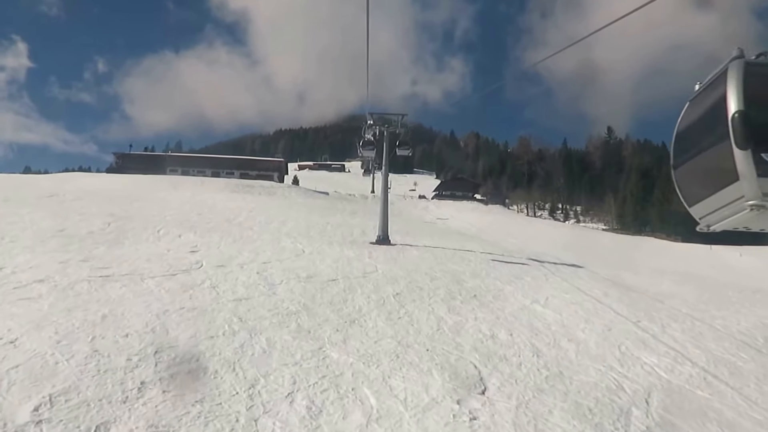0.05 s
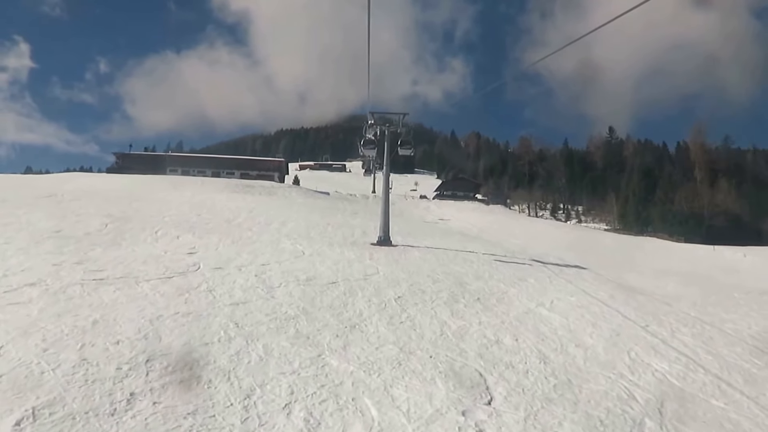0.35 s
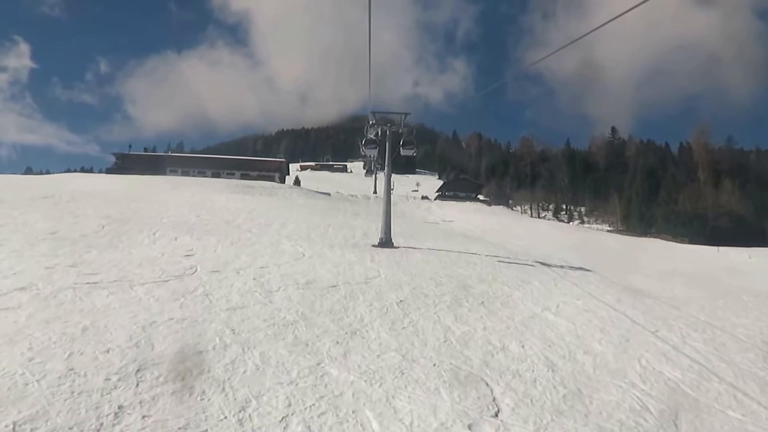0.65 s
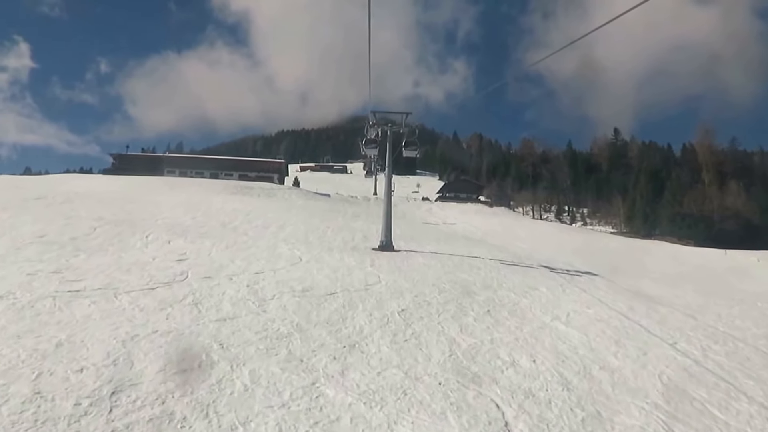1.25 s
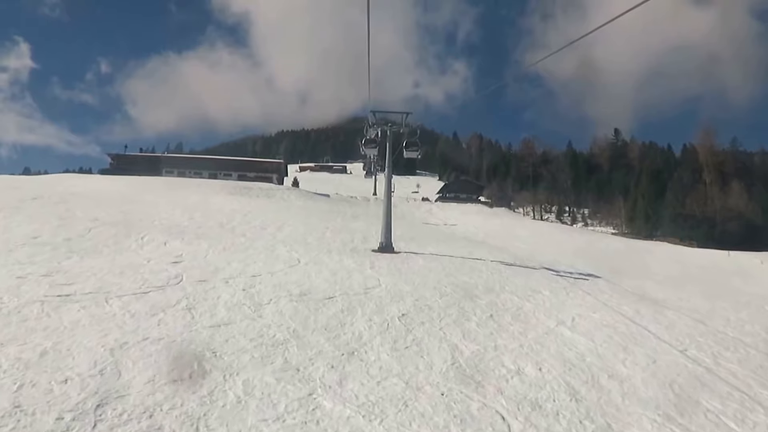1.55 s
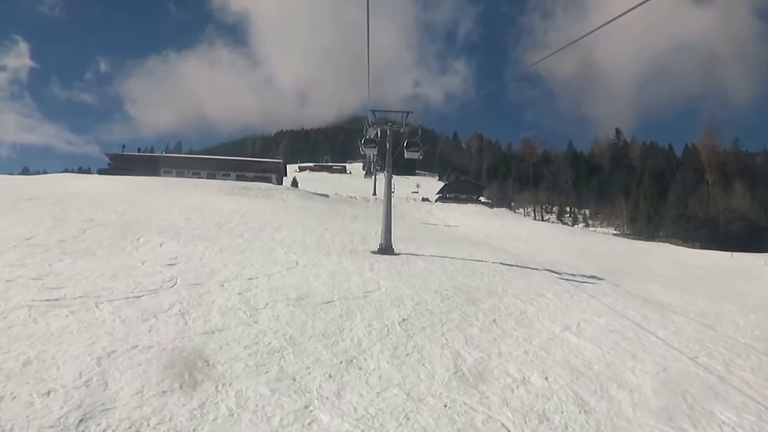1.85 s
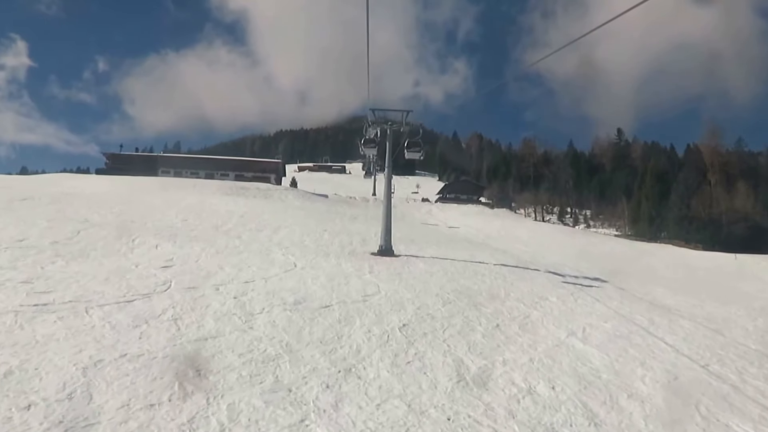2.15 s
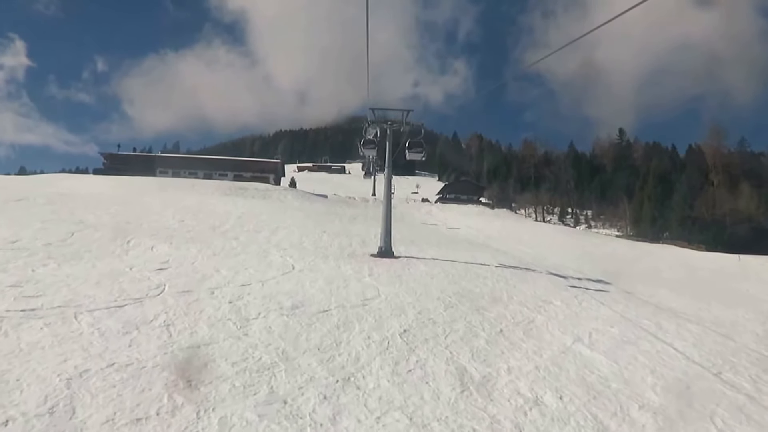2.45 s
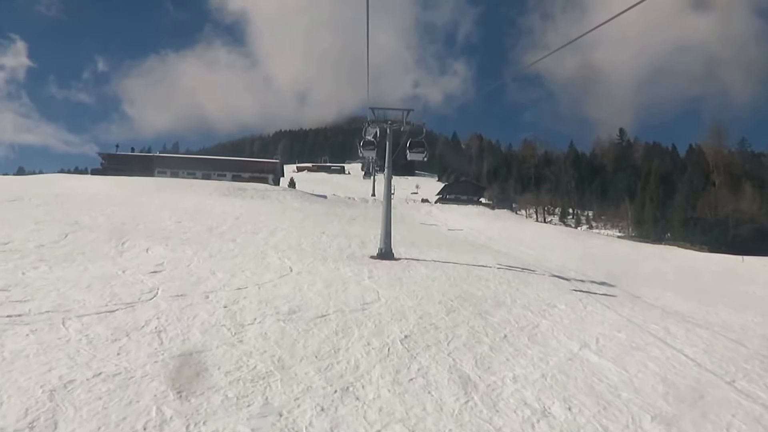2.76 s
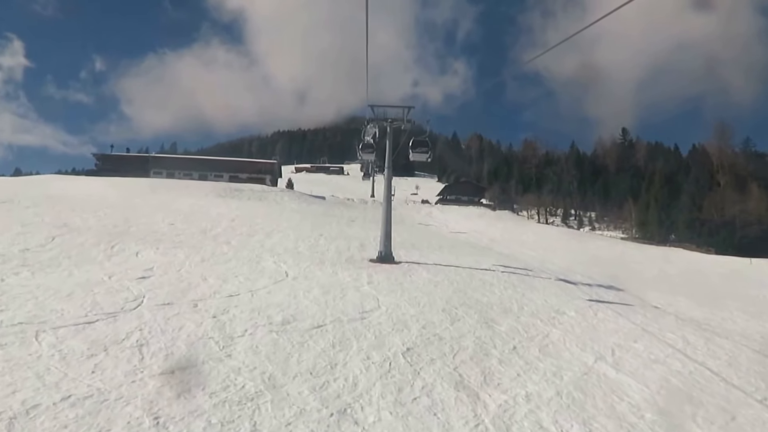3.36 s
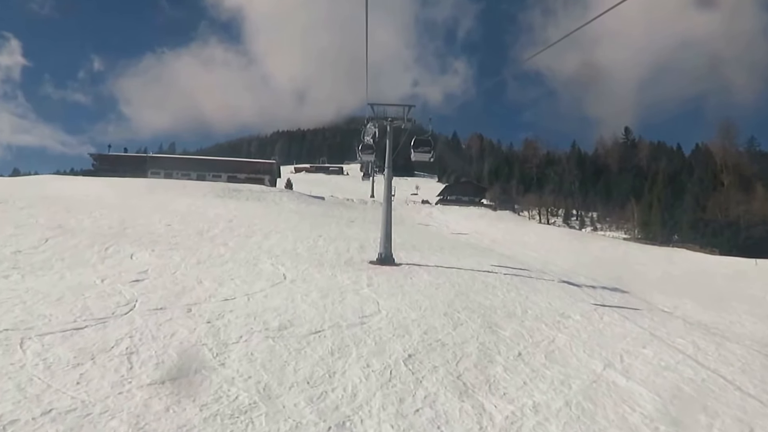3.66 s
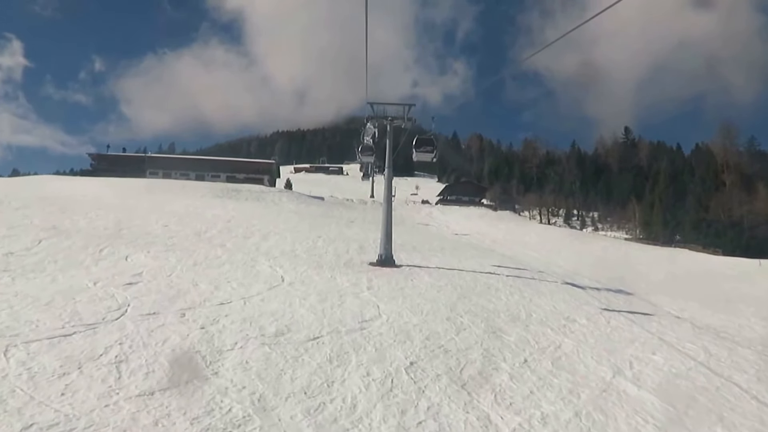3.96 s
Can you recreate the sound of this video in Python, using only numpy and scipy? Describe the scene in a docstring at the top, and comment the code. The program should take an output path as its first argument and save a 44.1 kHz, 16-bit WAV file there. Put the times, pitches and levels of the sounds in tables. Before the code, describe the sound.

Something loose knocks in short, rapid runs against the shell of a moving gondola cabin, heard from inside over a low rumble and hum. Halfway through, wind rises to a rustle and hollow howl, with small creaks and ticks nearby.

```python
"""Something loose knocks against the shell of a gondola cabin gliding up a snowy slope. The blows come
in short runs, about twelve a second, and flutter between the walls. The running rope shakes the cabin,
so it rumbles and hums. Wind hisses past, rising halfway through to a rustle on the shell and a hollow
howl in the gaps. A few small scuffs, creaks and ticks sound close by."""
import sys
import numpy as np
from scipy import signal
from scipy.fft import rfft, irfft
from scipy.io import wavfile
from scipy.ndimage import uniform_filter1d

SR = 44100
rng = np.random.default_rng(int(sys.argv[2]) if len(sys.argv) > 2 else 0)


def bounce(signal):
    """Save signal as a 16-bit WAV file at the path given by the first command-line argument."""
    frames = np.transpose(np.atleast_2d(signal))
    limited = np.clip(frames, -1, 1)
    pcm = np.round(limited * 32767).astype(np.int16)
    wavfile.write(sys.argv[1], SR, pcm)


N = 176400
TIME, HZ = np.arange(N) / SR, np.fft.rfftfreq(N, 1 / SR)


# blows on the shell: t/s, thump level/dB, clack level/dB, boom level/dB
BLOWS = [(0.7892, 0, 0, -4), (0.8686, -1.5, -5.5, 2.5), (0.9475, -14, -41, -20), (1.3562, -5.5, -7, -11),
         (1.4385, 1.5, -0.5, 3), (1.5172, -4.5, -17, 4), (1.5958, -4, -10, -3), (1.677, -13, -37, -19),
         (1.7595, -10, -21, -4.5), (2.1662, -13, -17, -6), (2.329, -22, -8, -28), (2.4092, -0.5, 0.5, -7),
         (2.4918, 0.5, 0, 0.5), (2.574, -30, -6, -20), (2.648, -14.5, -6, -20), (2.732, -16, -30, -23),
         (2.8149, -8.5, -25, -3.5), (2.895, -3, -8, -19), (2.974, -9, 0, 1.5), (3.0551, -2.5, -11, 2.5),
         (3.134, -1, -12, 3), (3.446, -10.5, -17, -10), (3.7736, -2, -23, -21), (3.8536, 0, -6.5, -30),
         (3.938, 0.5, 2.5, -15)]
# notes the cabin rings at: f/Hz, width/Hz, level in knocks/dB, level in rumble/dB
CABIN_NOTES = [(84.7, 7.3, 2, 9.5), (126.1, 6.4, 5, 11), (152.2, 17.6, -3.5, 1.5), (232, 16, -3.5, 7),
               (294, 18, -0.5, 11.5), (340, 24, -6.5, -3), (418.6, 15, -17, 1.5), (598, 10, -30, -5),
               (810, 8.9, 0, 2.5)]
# tone of the clack: f/Hz, level/dB
CLACK_TONE = [(150, -10), (400, 4), (560, 6), (700, 0.5), (870, 3), (1100, -16), (1400, -22), (1850, -12.5),
              (2400, -45), (6000, -39.5), (15000, -40)]
def knocks():
    """Each blow is a falling thump that bounces between the walls and rings the cabin, plus a clack."""
    start_hz, end_hz, glide_s = 750.5, 135.2, 0.00373  # the panel carries treble faster than bass
    hz = end_hz + (start_hz - end_hz) * np.exp(-TIME / glide_s)
    age = TIME / 0.0073  # the swell peaks at age 1
    thump = -(age * np.exp(1 - age)) ** 2 * np.sin(2 * np.pi * np.cumsum(hz) / SR)
    ring = 1 + sum(amp(db) * peak(f, width) for f, width, db, _ in CABIN_NOTES)
    blow = irfft(rfft(thump) * walls() * ring, N)[:SR // 2]
    thumps = play_at(blow, [(t, db) for t, db, _, _ in BLOWS])
    echo_s = WALL_ECHOES[0][0]
    clack_level = sum(amp(db) * (burst(t + 0.0031, 0.0098, 0.00054) + 0.49 * burst(t + echo_s, 0.031))
                      for t, _, db, _ in BLOWS)
    return amp(-10.5) * thumps + amp(-26) * clack_level * noise(tone(CLACK_TONE))


# first echoes in the cabin: delay/s, gain (minus flips the wave), treble limit/Hz
WALL_ECHOES = [(0.0169, 0.87, 2500), (0.0327, -0.42, 2000), (.0396, .7, 330), (.053, 0.15, 900)]
def walls():
    """A filter that adds the walls' late, duller copies to the direct sound."""
    return 1 + sum(gain * np.exp(-2j * np.pi * HZ * delay) / (1 + 1j * HZ / limit)
                   for delay, gain, limit in WALL_ECHOES)


# notes of the struck panel: f/Hz, level/dB, decay/s
PANEL_NOTES = [(496, -26, 0.0051), (591.4, -26, 0.013), (746, -38, 0.009), (832, -35, 0.013),
               (1314, -45, 0.014), (1788, -35.5, 0.0097)]
def panel():
    """The struck panel rings briefly under each clack, and the walls repeat it."""
    ring = sum(amp(db) * np.exp(-TIME / decay) * np.sin(2 * np.pi * f * TIME)
               for f, db, decay in PANEL_NOTES)
    echoed = irfft(rfft(ring) * (1 + 0.29 * (walls() - 1)), N)[:SR // 4]
    return play_at(echoed, [(t + 0.002, db) for t, _, db, _ in BLOWS])


def late_echoes():
    """Many later echoes blur each blow into the next."""
    power = sum((amp(db) * burst(t + 0.017, decay_s=0.029, rise_s=0.015)) ** 2 for t, db, _, _ in BLOWS)
    blur = steadied(noise(abs(peak(hz=312, width_hz=270)) ** 3), window_s=0.024, share=0.43)
    return amp(-19.5) * np.sqrt(power) * blur


# notes of the floor: f/Hz, width/Hz, level/dB
FLOOR_NOTES = [(89, 9.1, -15), (114.7, 14, -5.5), (163, 19, -7)]
def floor_boom():
    """The floor takes up each knock slowly and booms on."""
    power = sum((amp(db) * burst(t, decay_s=0.087, rise_s=0.02)) ** 2 for t, _, _, db in BLOWS)
    drone = steadied(ringing_noise(FLOOR_NOTES), window_s=0.18, share=1)
    return amp(-17.5) * np.sqrt(power) * drone


# strength of the deep shudder: t/s, level/dB
SHUDDER_LEVEL = [(0.0, -40.5), (0.11, -26.5), (0.19, -50), (0.24, -27.5), (1.2, -29), (1.28, -17.5),
                 (1.35, -35), (1.65, -22), (1.8, -37), (1.9, -15.5), (2.0, -28.5), (2.03, -22.5),
                 (2.62, -36), (2.66, -29), (3.99, -26.5), (4.0, -30)]
# tone of the drone: f/Hz, level/dB
DRONE_TONE = [(15, -18), (45, 2.5), (60, -6), (90, -2), (145, -1), (200, -5), (300, -18), (450, -16),
              (600, -22), (800, -24), (1100, -31.5), (1900, -38.5), (2600, -50), (8000, -84)]
# strength of the drone: t/s, level/dB
DRONE_LEVEL = [(0, -27), (.5, -27), (.9, -21.5), (1.15, -26), (1.6, -20.5), (2.1, -24), (2.5, -22),
               (2.68, -21), (2.78, -21.5), (2.95, -20.5), (3.15, -23), (3.3, -22), (3.42, -23),
               (3.6, -21.5), (4, -20.5)]
def rope_rumble():
    """The running rope shakes the cabin: a deep shudder, and a drone that rings the cabin's notes."""
    shudder_hz, width_hz = 33.4, 4.9
    deep_band = abs(peak(shudder_hz, width_hz) * peak(shudder_hz, 3 * width_hz))
    shudder = steadied(noise(deep_band), window_s=0.052, share=0.44)
    ring = 1 + sum(amp(db) * abs(peak(f, width)) ** 2 for f, width, _, db in CABIN_NOTES)
    drone = steadied(noise(tone(DRONE_TONE) * ring), window_s=0.11, share=0.64)
    return level(SHUDDER_LEVEL) * shudder + level(DRONE_LEVEL) * drone


# strength of the low hum: t/s, level/dB
HUM_SWELLS = [(0, -31.5), (.25, -27), (.55, -35), (1.02, -25), (1.15, -36), (1.85, -31), (2.05, -23.5),
              (2.45, -33), (2.65, -28), (3.48, -40), (3.56, -20.5), (3.68, -22.5), (3.76, -35), (3.9, -21),
              (4, -29.5)]
def cabin_hum():
    """The cabin's lowest note swells and fades as the rope shakes it."""
    hum = noise(abs(peak(hz=85.54, width_hz=8.3)) ** 2)
    return level(HUM_SWELLS) * steadied(hum, window_s=0.12, share=0.72)


# strength of the hiss: t/s, level/dB
HISS_GUSTS = [(0, -61), (.2, -48), (.38, -56), (.48, -55.5), (.72, -49), (.92, -54), (1.15, -55.5),
              (1.35, -52.5), (1.58, -48), (1.68, -54.5), (1.8, -52), (1.9, -43.5), (2.06, -38), (2.2, -37),
              (2.29, -36.5), (2.45, -37.5), (2.57, -35.5), (2.61, -41.5), (2.68, -45), (2.85, -45),
              (3.03, -40.5), (3.1, -33), (3.19, -46), (3.33, -49), (3.45, -38), (3.58, -41.5),
              (3.66, -38.5), (3.77, -44), (3.88, -37.5), (4, -39)]
# tone of the hiss: f/Hz, level/dB
HISS_TONE = [(300, 8), (800, 0.5), (1200, 4), (1900, 4), (2700, -1), (3700, 1.5), (5000, -2.5), (7000, -5),
             (8800, -9), (10500, -6.5), (12000, -12), (13300, -1), (14300, -33), (15200, -4.5)]
# strength of the high fizz: t/s, level/dB
FIZZ_GUSTS = [(0, -61), (.45, -70), (.535, -55), (.58, -60.5), (.72, -55.5), (.78, -51.5), (.85, -66),
              (1.2, -65), (1.75, -64), (1.95, -48.5), (2.15, -45), (2.35, -59), (3.3, -62), (3.42, -44),
              (3.6, -54), (4, -44)]
# tone of the fizz: f/Hz, level/dB
FIZZ_TONE = [(2000, -13), (4000, -13), (7000, 5), (9000, -1), (10500, 6), (12000, 1.5), (13500, 9),
             (14500, -19), (15200, -30)]
# one sharp gust: t/s, level/dB
SHARP_GUST = [(3.0, -64), (3.06, -56), (3.092, -30), (3.135, -55), (3.18, -50)]
def wind():
    """Gusts hiss past the shell with a fine fizz on top and one sharp swish."""
    hiss = level(HISS_GUSTS) * noise(tone(HISS_TONE)) * amp(2 + 0.52 * flicker(rate_hz=27))
    fizz = level(FIZZ_GUSTS) * noise(tone(FIZZ_TONE))
    in_gust = (TIME > SHARP_GUST[0][0]) * (TIME < SHARP_GUST[-1][0])
    swish = level(SHARP_GUST) * in_gust * noise(abs(peak(hz=1420, width_hz=2800)) ** 2)
    return grainy_hiss(hiss + fizz + swish)


def grainy_hiss(sound, count=14, waver_db=2):
    """Each band of the hiss wavers in level at random, making it grainy."""
    band_number = curve([(400, 0), (15000, count - 1)])
    spectrum = rfft(sound)
    bands = (irfft(spectrum * np.maximum(1 - abs(band_number - k), 0), N) for k in range(count))
    return sum(band * amp(waver_db * flicker(rate_hz=24)) for band in bands)


# notes of the cabin's gaps: f/Hz, width/Hz, level/dB
GAP_NOTES = [(405.3, 30.5, 3.5), (505, 100, -1.5), (610, 29, -3), (707, 22, -3.5), (830, 62, -7.5),
             (960, 61, -10), (1060, 25, -12), (1314, 60, -14.5), (1720, 71, -18)]
# bend of those notes: t/s, pitch factor
HOWL_BEND = [(0, 0.92), (2.03, 0.97), (2.22, 0.97), (2.33, 0.94), (2.43, 1.02), (2.54, 1.05), (2.7, .95),
             (3.1, 1.04), (3.3, .96), (4, 1.03)]
# strength of the howl: t/s, level/dB
HOWL_GUSTS = [(0, -46), (1.8, -52), (2, -32.5), (2.1, -30.5), (2.22, -29), (2.33, -30.5), (2.54, -28),
              (2.66, -45.5), (2.9, -36), (3.1, -29), (3.25, -45.5), (3.65, -34.5), (4, -42)]
def howl():
    """Wind rings in the gaps with a hollow sound that drifts up and down in pitch."""
    hollow = ringing_noise(GAP_NOTES)
    speed = np.interp(TIME, *np.transpose(HOWL_BEND))
    position = np.cumsum(speed) % N  # reading the noise faster raises its pitch
    return level(HOWL_GUSTS) * np.array([np.interp(position, np.arange(N), side) for side in hollow])


# brief whistles: t/s, length/s, f/Hz, level/dB
WHISTLE_NOTES = [(1.997, 0.16, 1052, -39), (2.017, .09, 510, -30), (2.119, 0.067, 580, -25.5),
                 (2.137, 0.12, 388, -26.5), (2.177, 0.092, 596, -26), (2.165, 0.068, 885, -31),
                 (2.42, 0.1, 1088, -36), (2.51, .05, 1292, -38)]
def whistles():
    """Now and then one gap catches the gust and sings a wavering note."""
    out = 0
    for t, length, hz, db in WHISTLE_NOTES:
        cycles = np.cumsum(hz * (1 + 0.03 * flicker(rate_hz=55.5))) / SR
        swell = np.sin(np.pi * np.clip((TIME - t) / length, 0, 1))
        out += amp(db) * swell * np.sin(2 * np.pi * cycles)
    return out


# strength of the rustle: t/s, level/dB
RUSTLE_GUSTS = [(0, -75), (1.8, -72), (2.06, -34), (2.17, -32), (2.35, -43), (2.56, -36), (2.65, -52),
                (2.95, -52), (3.09, -31.5), (3.22, -56), (3.5, -38), (3.75, -54), (4, -53)]
def rustle():
    """In the stronger gusts, the wind rustles on the shell as many tiny, brief pops."""
    pops_per_s = 460  # at each pitch
    out = 0
    for hz in (1165, 1580, 2390, 3300, 4280):
        size = amp(-3 * np.minimum(rng.exponential(1, N), 4))
        happens = rng.random(N) < pops_per_s / SR
        sign, pan = rng.choice([-1., 1.], N), rng.uniform(-0.4, 0.45, N)
        pops = size * happens * sign * np.array([1 + pan, 1 - pan])
        out += unit(irfft(rfft(pops) * peak(hz, width_hz=0.46 * hz) ** 2, N))
    return amp(-9) * level(RUSTLE_GUSTS) * unit(out)


# scuffs: t/s, level before tilt/dB, rise/s, decay/s, treble tilt/(dB per octave)
SCRAPES = [(0.534, -33.5, 0.011, 0.027, -0.5), (1.293, -44, 0.0036, 0.01, 0.5),
           (1.831, -35.5, 0.0072, 0.011, 2.5), (2.93, -34, .014, .008, -1), (2.985, -30.5, 0.018, 0.011, 0),
           (3.055, -33.5, .02, 0.028, 2.5)]
# tone of a scuff: f/Hz, level/dB
SCUFF_TONE = [(150, -30), (400, 6), (650, 2.5), (1000, -7), (1450, 0.5), (2100, -11.5), (3000, -19),
              (6000, -24.5), (14000, -41)]
def scuffs():
    """Dull scrapes against the shell swell and die away."""
    out = 0
    for t, db, rise, decay, tilt in SCRAPES:
        swell = np.clip((TIME - t) / rise, 0, 1)
        fade = np.exp(-np.maximum(TIME - t - rise, 0) / decay)
        out += amp(db) * swell * fade * noise(tone(SCUFF_TONE, tilt))
    return out


# rubs of the fittings: t/s, level/dB, decay/s, f/Hz, width/Hz
RUBS = [(.187, -36, 0.014, 600, 400), (.186, -28, 0.0053, 3600, 1890), (.203, -45, 0.016, 3300, 2500),
        (.3, -55, .06, 1980, 500), (.372, -53, 0.066, 2090, 400), (0.523, -27.5, 0.023, 536, 600),
        (1.63, -32.5, 0.035, 740, 220), (1.629, -42, .012, 1370, 500), (2.267, -20, 0.0084, 534, 400),
        (3.085, -26.5, .02, 750, 700), (3.545, -28.5, 0.0078, 1064, 700), (3.619, -22.5, 0.0045, 1381, 220),
        (3.67, -32.5, 0.011, 1380, 200), (3.783, -33, 0.0062, 1320, 250.4)]
def creaks():
    """The cabin's fittings rub briefly, each ringing one rough note."""
    return sum(amp(db) * burst(t, decay, rise_s=0.0024) * noise(abs(peak(f, width)) ** 3)
               for t, db, decay, f, width in RUBS)


# small ticks: t/s, level/dB, decay/s, treble tilt/(dB per octave)
SMALL_TICKS = [(0.117, -34.5, 0.0056, -1.5), (0.187, -23.5, 0.0059, -2.5), (0.195, -35, 0.037, -3.5),
               (0.542, -40.5, .014, 3), (.789, -44, 0.014, 2), (1.243, -39, .003, -1),
               (1.295, -35, 0.032, -3.5), (1.489, -34, .004, 0.5), (1.834, -31, 0.0043, -15),
               (3.643, -33, 0.011, 5)]
# tone of a tick: f/Hz, level/dB
TICK_TONE = [(150, -13), (600, 6), (1000, -4), (1700, 0), (2700, -7.5), (4000, -4.5), (7000, -13.5),
             (14000, -11.5)]
def ticks():
    """Dry ticks close by, each a short puff of noise."""
    return sum(amp(db) * burst(t, decay) * noise(tone(TICK_TONE, tilt))
               for t, db, decay, tilt in SMALL_TICKS)


# stereo width: f/Hz, level of the sides against the middle/dB
STEREO_WIDTH = [(30, -52), (85, -42.5), (175, -24.5), (350, -18.5), (700, -16.5), (1400, -9), (2800, -7.5),
                (5600, -1.5), (9000, 2.5), (14000, 8)]
def noise(gain):
    """Noise of strength 1 with a given tone, centred in the bass and wide in the treble."""
    mid, side = rfft(rng.standard_normal((2, N)))
    width = amp(curve(STEREO_WIDTH))
    left_right = np.array([mid + width * side, mid - width * side])
    return unit(irfft(left_right * gain / np.sqrt(1 + width ** 2), N))


def ringing_noise(notes):
    """Noise that rings at the listed notes."""
    return noise(sum(amp(db) * abs(peak(f, width)) ** 2 for f, width, db in notes))


def play_at(sound, hits):
    """Plays a sound at each (t/s, level/dB) hit."""
    strikes = np.zeros(N)
    for t, db in hits:
        strikes[min(round(t * SR), N - 1)] += amp(db)
    return signal.fftconvolve(strikes, sound)[:N]


def amp(db):
    """Turns decibels into a gain."""
    return 10 ** (np.asarray(db) / 20)


def unit(x):
    """Scales a sound to an average strength (rms) of 1."""
    return x / np.sqrt(np.mean(x ** 2) + 1e-20)


def curve(points):
    """Joins (f/Hz, value) points with straight lines on a pitch scale."""
    f, value = np.transpose(points)
    return np.interp(np.log(HZ + 1), np.log(f), value)


def tone(points, tilt=0):
    """Gain at each frequency; a tilt above 0 makes it brighter."""
    return amp(curve(points) + tilt * np.log2((HZ + 1) / SR))


def level(points):
    """Gain over time from (t/s, level/dB) points."""
    return amp(np.interp(TIME, *np.transpose(points)))


def peak(hz, width_hz):
    """A filter that rings at one note, with gain 1 at its centre."""
    return 1 / (1 + 2j * (HZ - hz) / width_hz)


def flicker(rate_hz):
    """A random wobble of strength 1, mostly slower than the given rate."""
    return unit(irfft(rfft(rng.standard_normal(N)) / (1 + (HZ / rate_hz) ** 2), N))


def steadied(x, window_s, share):
    """Evens out a share of the slow swings in a noise's loudness."""
    power = uniform_filter1d((x ** 2).mean(0), int(window_s * SR))
    return unit(x / (abs(power) + 1e-9) ** (share / 2))


def burst(start, decay_s, rise_s=0.0018):
    """A level that rises quickly and dies away."""
    age = np.maximum(TIME - start, 0)
    return np.minimum(age / rise_s, 1) * np.exp(-age / decay_s)


def scene():
    """Everything heard in the cabin."""
    knocking = knocks() + late_echoes() + panel() + floor_boom()
    cabin = knocking + ticks() + scuffs() + creaks() + rope_rumble() + cabin_hum()
    return cabin + wind() + rustle() + howl() + whistles()


def record(dry):
    """Cuts away the very highest treble."""
    limit_hz = 15000
    low_pass = signal.firwin(511, limit_hz, window=("kaiser", 9), fs=SR)
    return signal.oaconvolve(dry, low_pass[None], "same")


dry = scene()
out = record(dry)
bounce(out)
```